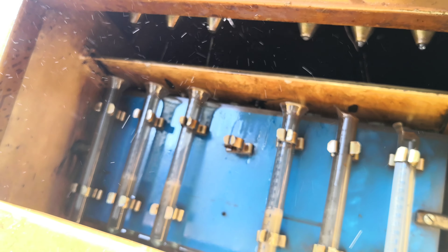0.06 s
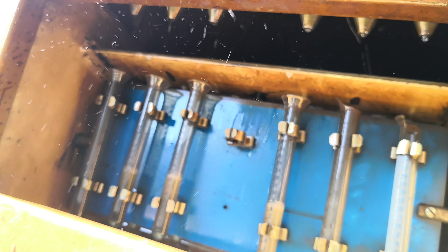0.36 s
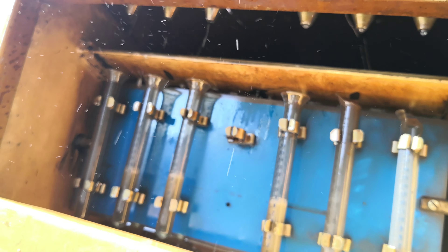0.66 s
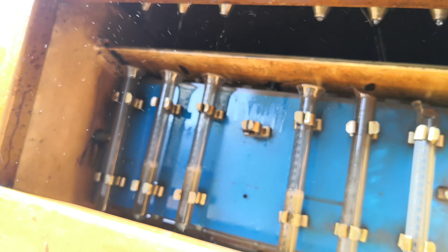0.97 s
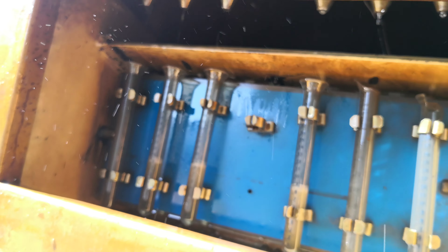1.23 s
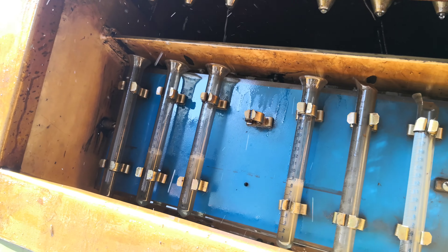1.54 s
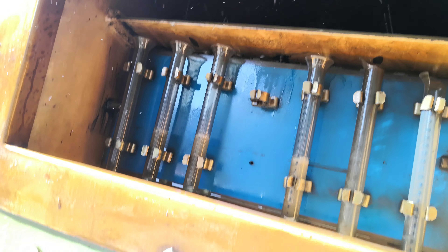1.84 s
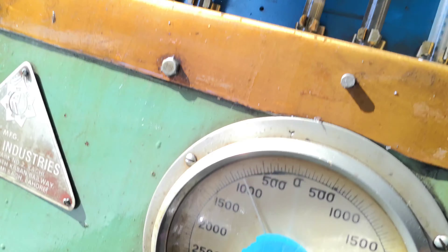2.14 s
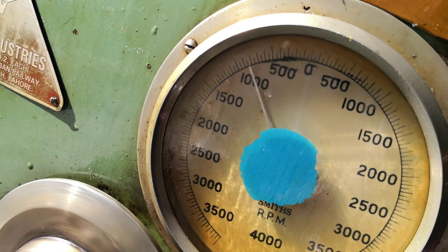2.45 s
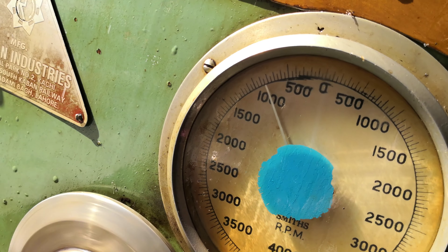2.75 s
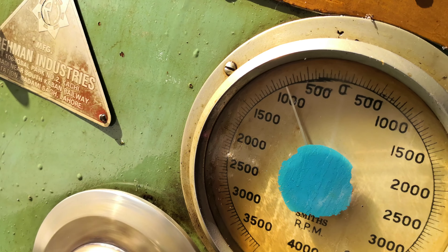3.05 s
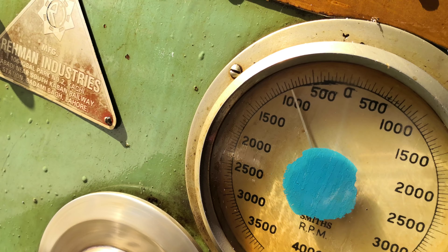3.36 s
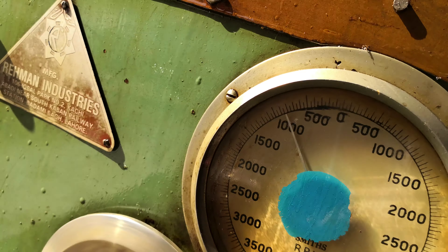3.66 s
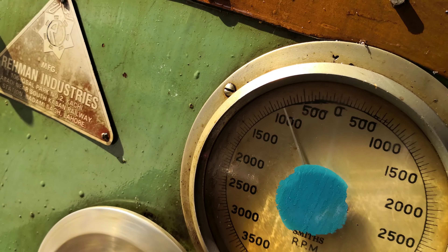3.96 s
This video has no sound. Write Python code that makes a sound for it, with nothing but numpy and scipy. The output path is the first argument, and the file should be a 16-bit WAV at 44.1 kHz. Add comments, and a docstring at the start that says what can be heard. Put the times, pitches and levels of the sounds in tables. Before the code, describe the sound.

Loud steady drone and fast metallic pulsing of a diesel pump on a test bench.

```python
"""Diesel injection pump on a test bench.

Each shaft turn repeats one pattern of metal knocks and one ringing delivery stroke.
Under it the bench hums, the drive whines and rattles, sheet-metal panels sing and fuel spray hisses.
Halfway the microphone moves from the measuring tubes to the speed dial: the hiss fades
and one panel rings up in short bursts."""
import sys
import numpy as np
from scipy import signal
from scipy.fft import rfft, irfft
from scipy.io import wavfile

SR = 44100
rng = np.random.default_rng(int(sys.argv[2]) if len(sys.argv) > 2 else 0)


def waveform_to_disk(signal):
    """Save audio, clipped to [-1, 1], as 16-bit WAV at the path in sys.argv[1]."""
    frames = np.transpose(np.atleast_2d(signal))
    scaled = np.clip(frames, -1, 1) * 32767
    samples = np.round(scaled).astype(np.int16)
    wavfile.write(sys.argv[1], SR, samples)


N = 176400
SHAFT_HZ = 14.844
CHATTER_DB, CHATTER_HZ = 3, 192  # fast level flicker of rattle and hiss


def amp(db):
    """Decibels to gain."""
    return 10 ** (np.asarray(db) / 20)


def unit(x):
    """Scale to rms 1."""
    return x / np.sqrt(np.mean(abs(x) ** 2) + 1e-20)


def read(points, hz, column=1):
    """Interpolate a table over log frequency."""
    table = np.array(points, float)
    return np.interp(np.log(hz + 1), np.log(table[:, 0] + 1), table[:, column])


def bins(size):
    """FFT bin frequencies in Hz."""
    return np.fft.rfftfreq(size, 1 / SR)


def pan(side_db):
    """Stereo gains; side is left minus right level."""
    return unit(amp(np.array([[side_db], [-side_db]]) / 2))


def wander(rate_hz):
    """Smooth random curve, rms 1."""
    return unit(irfft(rfft(rng.standard_normal(N)) * np.exp(-.5 * (bins(N) / rate_hz) ** 2), N))


def band_noise(hz, half_width_hz):
    """Independent left and right noise in one resonance."""
    spectrum = rfft(rng.standard_normal((2, N)))
    return unit(irfft(spectrum / (1 + ((bins(N) - hz) / half_width_hz) ** 2), N))


def add(mix, start_s, sound):
    """Add a sound to the mix, cropped at both ends."""
    at = round(start_s * SR)
    part = mix[:, max(at, 0):max(at + sound.shape[1], 0)]
    part += sound[:, max(-at, 0):][:, :part.shape[1]]


def alike_ears(pair, hz):
    """Correlate two independent channels as at the two ears."""
    # Each row: frequency in Hz, left-right correlation.
    likeness = [(100, 0.92), (220, 0.84), (350, 0.81), (520, 0), (720, 0.12), (930, 0), (1100, 0.63),
                (1300, 0.38), (2500, 0), (8000, 0.046)]
    same = read(likeness, hz)
    left, other = pair[..., 0, :], pair[..., 1, :]
    return np.stack([left, same * left + np.sqrt(1 - same ** 2) * other], -2)


def tubes_to_dial(at_tubes, at_dial, time_s, midpoint_s=2.07, move_s=.5):
    """Blend two values as the microphone moves from tubes to dial."""
    place = np.clip((time_s - midpoint_s) / move_s + .5, 0, 1)
    return at_tubes + (at_dial - at_tubes) * place


def turn_starts(slowing=.001, slowing_from_s=2.4):
    """Start of each shaft turn in seconds; a trace slower toward the end."""
    starts = np.arange(-1, N / SR * SHAFT_HZ) / SHAFT_HZ
    return starts + slowing * np.maximum(starts - slowing_from_s, 0)


def knocks(size=2048, rise_s=.0001, jitter_s=.0001, spread_db=.7, grain_db=1, repeat_share=.6):
    """Tappets, valves and injectors strike once a turn: grainy bursts, partly alike each time."""
    # Each row: time into the turn in seconds, level at tubes and at dial in dB, centre in Hz,
    # half-width in octaves, decay in seconds, side in dB.
    strikes = [(.0003, -21, -20.5, 4600, .8, 0.0041, -10), (.0062, -17, -17.5, 6950, 0.14, 0.0042, -3.5),
               (0.018, -18, -15, 7400, 0.19, 0.0031, 2), (.0200, -15, -14, 6600, .6, .003, -3),
               (.0290, -22, -19.5, 7000, 0.33, 0.0076, 0), (0.0292, -24.5, -18, 2360, 0.14, 0.007, -20),
               (.0394, -15, -10.5, 6700, .5, .003, 1.5), (.0402, -16, -15, 3200, .7, .002, -6),
               (.0440, -15, -18, 2100, .4, .0025, -6), (.0440, -9.5, -15, 4400, .22, .0018, -5),
               (.0440, -14.5, -18, 7420, 0.14, 0.0049, -5.5), (.0457, -16, -11.5, 4200, .3, .0017, -5),
               (.0475, -12.5, -20, 4300, .16, .002, -4), (0.0504, -24, -14.5, 6700, .8, 0.0036, -7),
               (0.0539, -17, -23, 4400, 0.23, 0.0025, -16), (.0620, -15, -12, 4800, .7, .0024, 2),
               (.0635, -20, -15, 2800, .45, .003, -8), (.0660, -16.5, -15.5, 2600, .4, .004, -12),
               (.0660, -17, -18, 7200, 0.36, 0.0035, 5)]
    out, t, starts = np.zeros((2, N)), np.arange(size) / SR, turn_starts()
    count = len(starts)
    for offset_s, tubes_db, dial_db, hz, width_oct, decay_s, side_db in strikes:
        repeated = np.sqrt(repeat_share) * rng.standard_normal((2, size))
        fresh = np.sqrt(1 - repeat_share) * rng.standard_normal((count, 2, size))
        noise = (repeated + fresh) * amp(grain_db * rng.standard_normal((count, 1, size)))
        detune_oct = .04 * rng.standard_normal((count, 1, 1))
        band = 1 / (1 + ((np.log2((bins(size) + 1) / hz) + detune_oct) / width_oct) ** 2)
        envelope = (1 - np.exp(-t / rise_s)) * np.exp(-t / decay_s)
        bursts = unit(irfft(alike_ears(rfft(noise), bins(size)) * band)) * envelope
        for at_s, burst, (late, force) in zip(starts + offset_s, bursts, rng.standard_normal((count, 2))):
            db = tubes_to_dial(tubes_db, dial_db, at_s) + spread_db * force
            add(out, at_s + jitter_s * late, amp(db) * pan(side_db) * burst)
    return out


def delivery(size=4096, jitter_s=.00007, spread_db=1.5):
    """Each delivery stroke rings pipes and housing, one resonance after another."""
    # Each row: time into the turn in seconds, pitch in Hz, sag in Hz/s, level at tubes and at dial
    # in dB, rise and decay in seconds, side in dB.
    rings = [(.0432, 550, 2400, -15.8, -14.8, .011, .0075, 3.5), (.0610, 570, 0, -25, -23, .005, .004, 3),
             (.0005, 460, 2000, -21, -20, .004, .008, 1), (.0335, 575, 0, -22.5, -22, .004, .005, 3),
             (.0345, 275, 0, -24, -25, .002, .006, 0), (.0435, 906, 0, -27, -28, .003, .013, 2),
             (.0435, 1277, 0, -29, -31, .002, .012, -5), (.0398, 5200, 0, -24, -17.5, .0004, .003, -3),
             (.0440, 4780, 0, -23, -23, .0005, .004, -5), (.0660, 1940, 0, -29, -23, .0007, .009, -5)]
    out, t, starts = np.zeros((2, N)), np.arange(size) / SR, turn_starts()
    for offset_s, hz, sag_hz_per_s, tubes_db, dial_db, rise_s, decay_s, side_db in rings:
        envelope = (1 - np.exp(-(t / rise_s) ** 2)) * np.exp(-t / decay_s)
        phase = 2 * np.pi * (hz - sag_hz_per_s * t / 2) * t
        ring = pan(side_db) * envelope / envelope.max() * np.sin(phase)
        for at_s, (late, force) in zip(starts + offset_s, rng.standard_normal((len(starts), 2))):
            db = tubes_to_dial(tubes_db, dial_db, at_s) + spread_db * force
            add(out, at_s + jitter_s * late, amp(db) * ring)
    return out


def tone(hz, waver, throb=1, waver_hz=4.8):
    """Sine wavering in level and phase, rms 1."""
    carrier = np.exp(2j * np.pi * (hz * np.arange(N) / SR + rng.random()))
    drift = wander(waver_hz) + 1j * wander(waver_hz)
    return unit((carrier * throb * (1 + waver * drift)).real)


def hum(throb_at_s=.026, throb_depth=.27, throb_rad=.25, dial_db=-1.5):
    """The bench shakes at shaft harmonics and throbs once a turn as the pump takes up load."""
    # Each row: multiple of shaft speed, level in dB, waver share.
    harmonics = [(4, -41, 0.26), (5, -38, 0.23), (7, -42, 0.35), (8, -25.7, .22), (9, -34, 1),
                 (10, -49, 0.69), (13, -34.5, 0.5)]
    t = np.arange(N) / SR
    angle = 2 * np.pi * SHAFT_HZ * (t - throb_at_s)
    throb = 1 + throb_depth * np.cos(angle) + 1j * throb_rad * np.sin(angle)
    lines = sum(amp(db) * tone(order * SHAFT_HZ, waver, throb) for order, db, waver in harmonics)
    return lines * amp(tubes_to_dial(0, dial_db, t))


def whine():
    """Thin tones of gears and motor."""
    # Each row: pitch in Hz, level at tubes and at dial in dB, side in dB.
    lines = [(86.7, -35, -37, -3), (173, -39, -54, 3), (698, -39.5, -44, -1), (1276.6, -36.5, -38, -6),
             (905.5, -42, -39.5, -8), (1632, -40, -46, 3), (1944, -44, -40, -4)]
    t = np.arange(N) / SR
    return sum(pan(side_db) * amp(tubes_to_dial(tubes_db, dial_db, t)) * tone(hz, waver=.37)
               for hz, tubes_db, dial_db, side_db in lines)


def rattle(level_db=-19.3, teeth=18, mesh_depth=.026, crossover_hz=1580):
    """The drive rumbles below and chatters above, pulsing faintly as gear teeth meet."""
    # Each row: frequency in Hz, relative spectral density at tubes and at dial in dB.
    density = [(20, -36, -41), (44.5, -28, -23), (63.6, -31, -15), (107, -13, -12.5), (166, -14.5, -9),
               (224, -9, -10.5), (257, -7, -9), (341, -13.5, -12.5), (354, -5.5, -4.5), (470, -5, -4),
               (560, -9.5, -8), (680, -14, -14.5), (990, -9, -12.5), (1020, -16, -16.5), (1400, -15, -15.5),
               (1650, -11, -12), (2420, -11, -9), (3030, -23.5, -8), (4200, -13, -15), (5000, -12.5, -12.5),
               (5800, -19, -20.5), (7500, -14, -16), (11400, -15, -12.5), (15000, -15, -14)]
    # Each row: frequency in Hz, side in dB.
    balance = [(60, -2), (200, -1), (380, -1), (560, 2), (750, 1), (930, 1), (1290, -4.5), (2380, -3),
               (4400, -6), (6200, 1), (7800, -11.5), (15000, 1.5)]
    t, hz = np.arange(N) / SR, bins(N)
    mesh = 1 + mesh_depth * np.cos(2 * np.pi * teeth * SHAFT_HZ * t)
    chatter = unit(mesh * amp(CHATTER_DB * wander(CHATTER_HZ)))
    smooth, rough = rng.standard_normal((2, 2, N))
    rough_share = 1 / (1 + (crossover_hz / (hz + 1)) ** 2)
    spectrum = rfft(smooth) * np.sqrt(1 - rough_share) + rfft(rough * chatter) * np.sqrt(rough_share)
    sides = amp(np.outer([1, -1], read(balance, hz)) / 2)
    spectrum = alike_ears(spectrum, hz) * sides / np.sqrt(np.mean(sides ** 2, 0))
    tubes, dial = (irfft(spectrum * amp(read(density, hz, column)), N) for column in (1, 2))
    return amp(level_db) * tubes_to_dial(tubes, dial, t) / np.std(microphone(tubes))


def panels(swell_db=2.4, swell_hz=13):
    """Shaken sheet metal sings at its resonances, swelling and fading."""
    # Each row: centre and half-width in Hz, level at tubes and at dial in dB, side in dB.
    modes = [(265, 11.8, -39, -31, -1), (295.5, 14.7, -32.5, -49, 0.5), (410, 29, -36.5, -32, 10),
             (2450, 55, -33, -28.5, -5), (2570, 55, -32, -28.5, -5), (2965, 50, -31, -28.5, -8),
             (3134, 50, -40, -38, -20), (3580, 150, -30, -35, -10), (4770, 290, -32, -34.5, -1)]
    out, t = np.zeros((2, N)), np.arange(N) / SR
    for hz, half_width_hz, tubes_db, dial_db, side_db in modes:
        ring = alike_ears(band_noise(hz, half_width_hz), hz)
        ring = unit(ring * amp(swell_db * wander(swell_hz)))
        out += pan(side_db) * amp(tubes_to_dial(tubes_db, dial_db, t)) * ring
    return out


def fuel_hiss(centre_hz=3110, half_width_oct=.4, top_hz=3700):
    """Fuel sprays at the tubes: a bright, grainy hiss with a steep upper edge."""
    # Each row: time in seconds, level in dB.
    levels = [(0, -22), (.65, -25), (.95, -19), (1.502, -20.5), (2.1, -20.5), (2.448, -26.5), (4, -38)]
    level_db = np.interp(np.arange(N) / SR, *np.transpose(levels))
    spray = band_noise(centre_hz, centre_hz * (2 ** half_width_oct - 1))
    spray *= amp(CHATTER_DB * wander(CHATTER_HZ))
    low_pass = 1 / np.sqrt(1 + (bins(N) / top_hz) ** 36)
    return pan(side_db=-9) * amp(level_db) * unit(irfft(rfft(spray) * low_pass, N))


def panel_swells(length_s=.11, waver_rms_hz=45):
    """Beside the dial one panel rings up in short bursts of wavering pitch."""
    # Each row: peak time in seconds, pitch in Hz, level in dB.
    swells = [(2.18, 2500, -19), (2.256, 2430, -28), (2.66, 2540, -23), (2.784, 2470, -21),
              (2.92, 2491, -27), (3.0, 2480, -24), (3.06, 2530, -22), (3.311, 2540, -20.5),
              (3.39, 2470, -22), (3.46, 2523, -23), (3.61, 2545, -20.5), (3.86, 2506, -22.5)]
    out, size = np.zeros((2, N)), round(length_s * SR)
    for peak_s, hz, db in swells:
        pitch_hz = hz + waver_rms_hz * wander(rate_hz=25)[:size]
        ring = np.hanning(size) * np.sin(2 * np.pi * np.cumsum(pitch_hz) / SR)
        add(out, peak_s - length_s / 2, amp(db) * pan(side_db=-5) * ring)
    return out


def workshop_reverb(x, level_db=-11, t60_s=.2, size=12000):
    """Short, dense tail from bench cabinet and walls."""
    t = np.arange(size) / SR
    tail = rng.standard_normal((2, size)) * np.exp(-np.log(1000) * t / t60_s)
    return amp(level_db) * signal.fftconvolve(x, tail / np.linalg.norm(tail[0]), axes=1)[:, :N]


def standing_waves(x):
    """Standing waves at the bench put the low mids out of step between the ears."""
    # Each row: frequency in Hz, phase lead of the left ear in radians.
    lead = [(20, 0.026), (310, 0), (410, 0.84), (520, 1.54), (610, 1.53), (750, 0), (930, 1.03),
            (1080, 0.73), (1280, 0.74), (1600, 0)]
    return irfft(rfft(x) * np.exp(.5j * np.outer([1, -1], read(lead, bins(N)))), N)


def microphone(x):
    """The microphone loses most treble above 8 kHz."""
    # Each row: frequency in Hz, gain in dB.
    response = [(20, 2), (7700, -2.5), (8150, -11.5), (8600, -21), (9400, -23), (10050, -46), (10500, -23),
                (12000, -20), (15500, -24.5)]
    return irfft(rfft(x) * amp(read(response, bins(N))), N)


def scene():
    """Pump, bench and drive; reverb on the knocks only."""
    blows = knocks()
    pump = blows + workshop_reverb(blows) + delivery()
    bench = hum() + whine() + rattle() + panels() + panel_swells()
    return standing_waves(pump + bench + fuel_hiss())


def record(dry, ceiling=.95, knee=12, cutoff_hz=15500):
    """Microphone colour, soft clip, band limit."""
    x = microphone(dry)
    x = x / (1 + abs(x / ceiling) ** knee) ** (1 / knee)
    low_pass = signal.firwin(401, cutoff_hz, window=("kaiser", 9), fs=SR)
    return signal.oaconvolve(x, low_pass[None], "same", axes=1)


dry = scene()
out = record(dry)
waveform_to_disk(out)
```